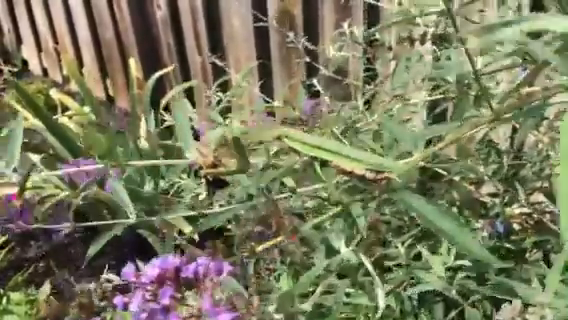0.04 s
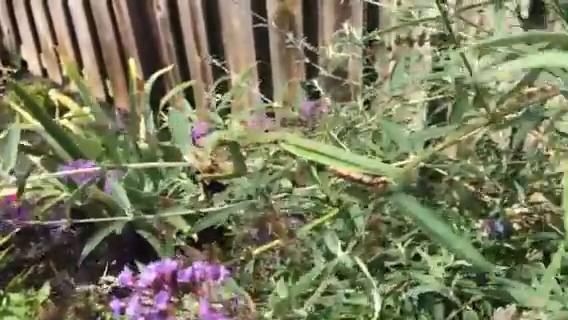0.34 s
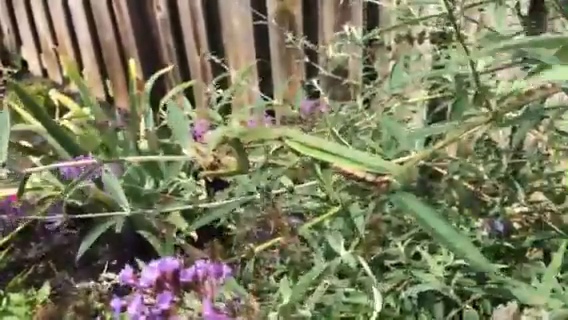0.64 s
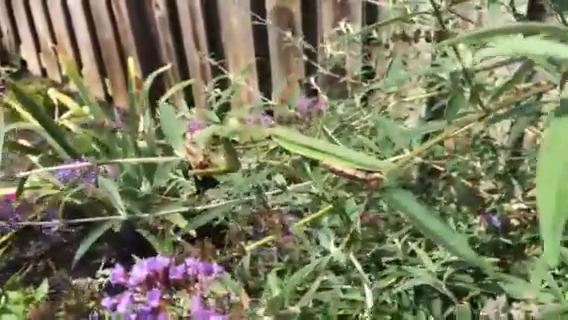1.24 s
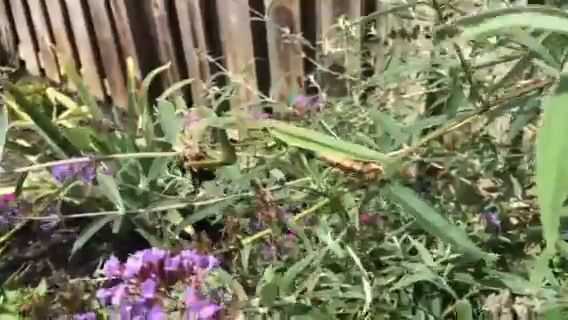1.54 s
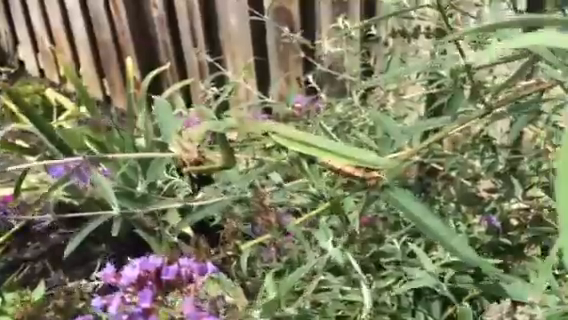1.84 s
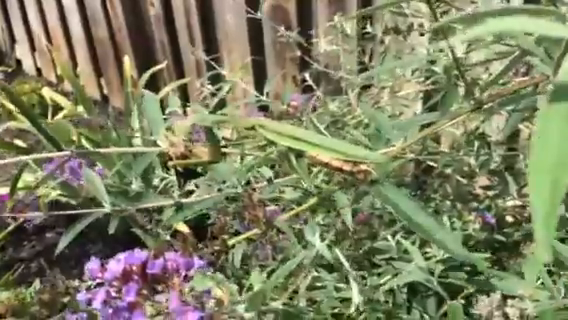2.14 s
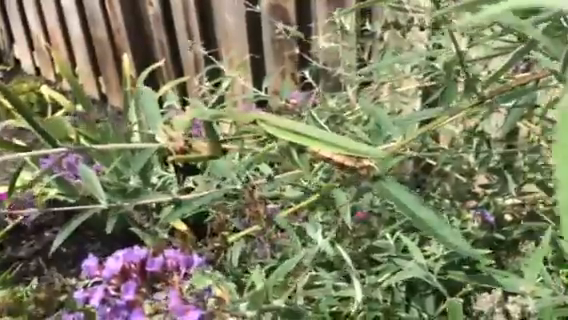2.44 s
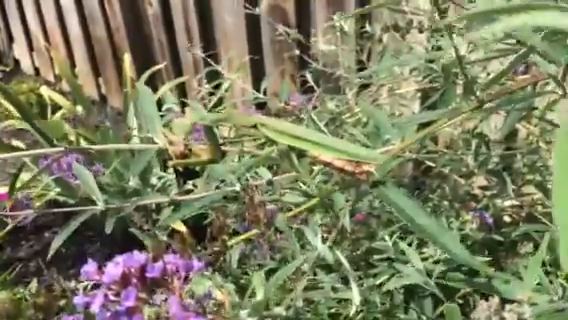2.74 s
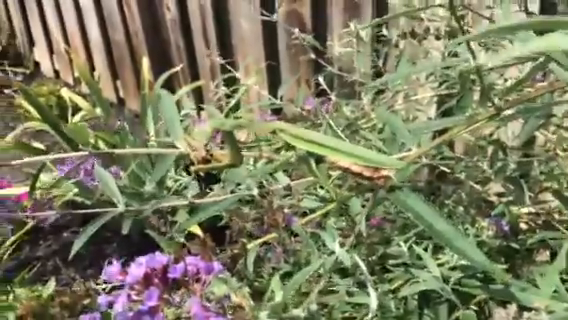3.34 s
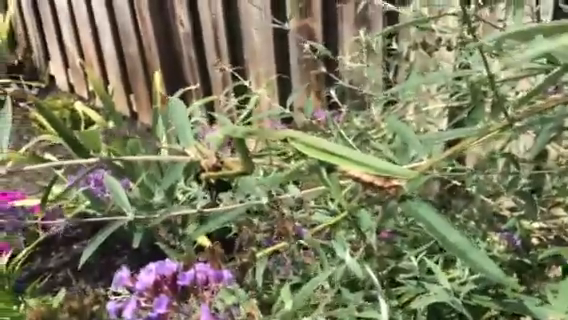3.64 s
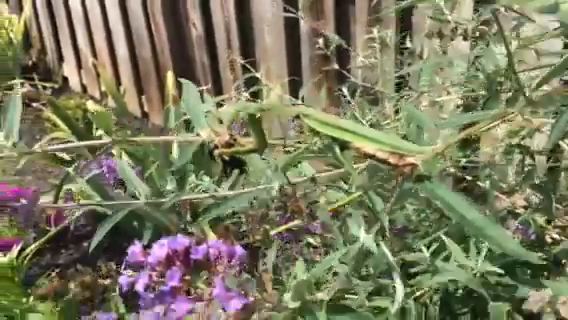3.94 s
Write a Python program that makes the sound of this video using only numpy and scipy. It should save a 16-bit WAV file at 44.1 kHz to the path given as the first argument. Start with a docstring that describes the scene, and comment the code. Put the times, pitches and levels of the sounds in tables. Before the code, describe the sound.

A cricket chirps steadily in a garden while other insects buzz high above it and a lower cricket trills in short runs during the first half. Faint wind rumble and a distant motor hum lie behind.

```python
"""Sunny garden with insects.

A cricket chirps steadily, a lower one trills in short runs, and bush-crickets buzz high above
them, one regularly, the others loosely. Each call is a train of wing strokes, short gliding
tones scattered by leaves and a fence. Twigs tick; faint wind rumble, a distant motor hum and
the thin hiss of far insects lie behind."""
import sys
import numpy as np
from scipy import signal
from scipy.fft import rfft, irfft
from scipy.io import wavfile

SR = 44100
rng = np.random.default_rng(int(sys.argv[2]) if len(sys.argv) > 2 else 0)


def master_out(mix):
    """Clip the mix to full scale and print it as 16-bit PCM to the path in sys.argv[1]."""
    frames = np.transpose(np.atleast_2d(mix))
    ceiling = np.clip(frames, -1, 1)
    pcm = np.round(ceiling * 32767).astype(np.int16)
    wavfile.write(sys.argv[1], SR, pcm)


N = 176400
T = np.arange(N) / SR


def from_db(db):
    """Decibels to gain."""
    return 10 ** (np.asarray(db) / 20)


def gain_curve(points):
    """Gain over time from (time [s], level [dB]) points."""
    return from_db(np.interp(T, *np.transpose(points)))


def add(out, start_s, sound):
    """Mix a sound in at start_s."""
    i = int(round(start_s * SR))
    a, b = max(i, 0), min(i + len(sound), len(out))
    if b > a:
        out[a:b] += sound[a - i:b - i]


def noise(gain_at):
    """Unit-rms noise shaped by gain_at(hz)."""
    hz = np.maximum(np.arange(N // 2 + 1) * SR / N, 1)
    shaped = irfft(rfft(rng.standard_normal(N)) * gain_at(hz), N)
    return shaped / np.sqrt(np.mean(shaped ** 2) + 1e-30)


def coloured_noise(points):
    """Unit-rms noise from (frequency [Hz], relative level [dB]) points."""
    hz, db = np.transpose(points)
    return noise(lambda f: from_db(np.interp(np.log(f), np.log(hz), db)))


def band_noise(hz, width_hz):
    """Unit-rms noise in one steep-sided band."""
    return noise(lambda f: 1 / (1 + (2 * (f - hz) / width_hz) ** 4))


def wing_stroke(length_s, hz, fall_hz=0, arch_hz=0):
    """A tone that swells and fades while its pitch falls or arches."""
    u = np.linspace(-1, 1, max(int(length_s * SR), 2))
    pitch_hz = hz - fall_hz * u / 2 - arch_hz * u ** 2
    cycles = np.cumsum(pitch_hz) / SR + rng.random()
    return np.cos(np.pi * u / 2) * np.sin(2 * np.pi * cycles)


def scatter(call, echo_db, t60_s=.28):
    """A call plus its decaying echoes from leaves and fence."""
    t = T[:SR // 2]
    echoes = rng.standard_normal(len(t)) * from_db(-60 * t / t60_s)
    echoes /= np.sqrt(np.sum(echoes ** 2))
    return call + from_db(echo_db) * signal.fftconvolve(call, echoes)[:N]


# Wind and far traffic: (frequency [Hz], relative level [dB])
AIR_SPECTRUM = [(20, -19), (35, -5), (55, -1), (100, 1.5), (150, -2), (205, -6.2), (320, -15.3),
                (500, -17.6), (800, -19.1), (1400, -25.2), (2200, -33), (3500, -38.3), (6000, -42),
                (7600, -43), (11000, -46.5), (15000, -48)]
# Low-end swell: (time [s], gain [dB])
GUST_GAINS = [(0, 1), (.6, -.5), (.92, 0), (.965, 6), (1.02, -1.5), (1.63, -2), (1.675, 2), (1.72, -1.5),
              (2.1, -1.5), (2.5, 1.5), (3.05, -.5), (3.4, 1.5), (4, 1.5)]
# Treble hiss: (frequency [Hz], relative level [dB])
HISS_SPECTRUM = [(8000, -30), (10500, -6), (12800, -4), (13700, 0), (14400, -1), (15150, 2), (15600, -30)]
# Treble hiss: (time [s], level [dB])
HISS_LEVELS = [(0, -80), (.5, -80), (1.2, -78), (1.58, -78.5), (1.68, -90), (1.85, -82), (2.7, -82.5),
               (2.82, -96), (3.3, -96), (3.42, -83), (4, -82)]


def air(bed_db=-52.4, gust_cutoff_hz=220):
    """Outdoor noise whose low end swells with the wind; thin hiss on top."""
    bed = from_db(bed_db) * coloured_noise(AIR_SPECTRUM)
    rumble = signal.sosfiltfilt(signal.butter(2, gust_cutoff_hz, fs=SR, output="sos"), bed)
    hiss = gain_curve(HISS_LEVELS) * coloured_noise(HISS_SPECTRUM)
    return bed + (gain_curve(GUST_GAINS) - 1) * rumble + hiss


# Motor hum: (time [s], level [dB])
HUM_LEVELS = [(0, -41), (.33, -42), (.5, -54), (.8, -54), (.95, -52), (1.12, -60), (1.35, -53), (1.55, -61),
              (1.85, -51), (2.1, -57), (2.6, -52), (2.9, -51), (3.07, -57), (3.17, -47), (3.45, -42.5),
              (3.7, -39), (3.92, -41), (4, -51)]
# Machine drones: (centre [Hz], width [Hz], level [dB])
DRONE_BANDS = [(56, 6, -62), (75, 5, -59.5), (117, 10, -58), (172, 16, -62.5), (228, 10, -65),
               (294, 8, -73), (411, 12, -76), (1001, 5, -84), (1235, 4, -80.5)]


def motors(hum_hz=117, waver_hz=.9):
    """A far motor fades and returns among fainter machine drones."""
    pitch_hz = hum_hz + waver_hz * band_noise(0, width_hz=8)
    hum = gain_curve(HUM_LEVELS) * np.sin(2 * np.pi * np.cumsum(pitch_hz) / SR)
    drones = sum(from_db(db) * band_noise(hz, width_hz) for hz, width_hz, db in DRONE_BANDS)
    return hum + drones


def far_insects():
    """Distant buzzes and trills blur into two noise bands."""
    buzzes = from_db(-86) * band_noise(hz=8720, width_hz=650)
    trills = from_db(-89) * band_noise(hz=3310, width_hz=450)
    return buzzes + trills


# Twig snaps: (time [s], level [dB], T60 [s])
TWIG_TICKS = [(.390, -66, .012), (.475, -68, .014), (.493, -66.5, .025), (.586, -63, .045),
              (.606, -63, .035), (1.3375, -55, .004), (1.619, -55, .004)]
# Snap colour: (frequency [Hz], relative level [dB])
TWIG_SPECTRUM = [(1500, -14), (3000, -4), (4000, 3), (5000, -2), (7000, -1), (11000, -5), (15000, -12)]


def twigs():
    """Tiny dry snaps: noise with instant onset and fast decay."""
    envelope, t = np.zeros(N), T[:SR // 10]
    for time_s, db, t60_s in TWIG_TICKS:
        add(envelope, time_s, from_db(db - 60 * t / t60_s))
    return envelope * coloured_noise(TWIG_SPECTRUM)


def buzz(length_s, rate_hz, stroke_s, resonances):
    """Rapid uneven wing strokes on (pitch [Hz], fall [Hz], gain [dB]) resonances."""
    jitter_s, spread_db, spread_hz, edge_db = .0006, 1.3, 70, -5
    out = np.zeros(SR // 4)
    for time_s in np.arange(0, length_s, 1 / rate_hz):
        late, loud, sharp = rng.standard_normal(3)
        taper_db = edge_db * (2 * time_s / length_s - 1) ** 4
        stroke = sum(from_db(db) * wing_stroke(stroke_s, hz + spread_hz * sharp, fall_hz)
                     for hz, fall_hz, db in resonances)
        add(out, time_s + jitter_s * late, from_db(taper_db + spread_db * loud) * stroke)
    return out


# Loose buzzes: (start [s], end [s], level [dB], pitch [Hz])
LOOSE_BUZZES = [(0, .03, -68, 8550), (.10, .16, -73, 8550), (.20, .23, -68, 8250), (.232, .277, -64, 8480),
                (.41, .46, -74, 8800), (.475, .55, -64.5, 8480), (.58, .61, -68, 8450),
                (.69, .75, -70, 8700), (.745, .865, -64, 8500), (1.005, 1.03, -67, 8800),
                (1.035, 1.165, -64, 8520), (1.17, 1.20, -71, 8220), (1.265, 1.37, -65, 8500),
                (1.43, 1.48, -74, 8800), (1.51, 1.62, -66, 8500), (1.765, 1.86, -64, 8450),
                (1.94, 2.01, -73, 8750), (2.07, 2.16, -65, 8470), (2.19, 2.23, -70, 8400),
                (2.315, 2.50, -67, 8550), (2.53, 2.58, -73, 8700), (2.615, 2.64, -69, 8350),
                (2.642, 2.685, -64, 8550), (2.79, 2.88, -72, 8650), (3.03, 3.12, -64, 8550),
                (3.13, 3.18, -73, 8400), (3.25, 3.30, -72, 8600), (3.33, 3.40, -72, 8750),
                (3.47, 3.54, -72, 8750), (3.555, 3.635, -64, 8520), (3.68, 3.78, -69, 8700),
                (3.79, 3.87, -64, 8550), (3.93, 4.0, -68, 8500)]


def loose_bush_crickets(rate_hz=131, stroke_s=.0062, fall_hz=720, trim_db=-2.8):
    """Irregular buzzes, each on one wing resonance."""
    out = np.zeros(N)
    for start_s, end_s, db, hz in LOOSE_BUZZES:
        call = buzz(end_s - start_s, rate_hz, stroke_s, [(hz, fall_hz, trim_db)])
        add(out, start_s - stroke_s, from_db(db) * call)
    return scatter(out, echo_db=-2)


# Regular buzzes: (centre time [s], level [dB])
REGULAR_BUZZES = [(.141, -68), (.373, -68), (.617, -69), (.866, -69), (1.115, -68), (1.363, -66),
                  (1.612, -67), (1.850, -67), (2.085, -67), (2.326, -67), (2.564, -66), (2.800, -67),
                  (3.046, -66), (3.273, -69), (3.514, -70), (3.756, -69), (3.995, -68)]


def regular_bush_cricket(length_s=.058, rate_hz=138, stroke_s=.0048):
    """About four buzzes a second on two wing resonances."""
    resonances = [(9530, 550, -2.6), (8780, 900, -3)]
    out = np.zeros(N)
    for centre_s, db in REGULAR_BUZZES:
        call = buzz(length_s, rate_hz, stroke_s, resonances)
        add(out, centre_s - length_s / 2, from_db(db) * call)
    return scatter(out, echo_db=-6)


# Trills: (first stroke [s], last stroke [s], spacing [s], first level [dB], last level [dB])
TRILL_RUNS = [(.007, .048, .02, -65, -58), (.410, .478, .023, -66, -59), (.546, .569, .023, -63, -59),
              (.592, .608, .016, -47, -58), (.635, .748, .016, -69, -64), (.765, .867, .017, -63, -62),
              (.886, .929, .021, -61, -61), (1.233, 1.325, .0153, -69, -69),
              (1.343, 1.431, .0176, -69, -66), (1.766, 1.790, .024, -65, -62),
              (1.852, 1.936, .0168, -63, -70.5), (2.093, 2.120, .027, -72, -72)]


def trilling_cricket(pitch_hz=3310, spread_hz=28, fall_hz=330, stroke_s=.0105, trim_db=-.6):
    """Runs of short falling wing strokes, each run on a level ramp."""
    out = np.zeros(N)
    for first_s, last_s, spacing_s, first_db, last_db in TRILL_RUNS:
        count = int(round((last_s - first_s) / spacing_s)) + 1
        times_s = np.linspace(first_s, last_s, count)
        levels_db = np.linspace(first_db, last_db, count)
        for time_s, db in zip(times_s, levels_db):
            stroke = wing_stroke(stroke_s, pitch_hz + rng.normal(0, spread_hz), fall_hz)
            add(out, time_s - stroke_s / 2, from_db(db + trim_db) * stroke)
    return scatter(out, echo_db=-18)


# Chirps, timed at the first strong stroke: (time [s], level [dB])
CRICKET_CHIRPS = [(.264, -62.5), (.608, -62.5), (.980, -64), (1.356, -62), (1.728, -62), (2.106, -63),
                  (2.447, -64), (2.818, -65), (3.183, -64), (3.575, -62), (3.939, -62)]
# Strokes of one chirp: (offset [s], relative level [dB], pitch [Hz])
CHIRP_STROKES = [(-.034, -8.5, 4790), (0, 0, 4895), (.041, 0, 4920), (.070, -12.5, 4850)]


def chirping_cricket(stroke_s=.021, spread_hz=15, trim_db=-3.2, fence_echo_s=.014, fence_echo_db=-11):
    """Four raspy wing strokes a chirp, the middle two strong, each smeared by a close echo off the fence."""
    tones = np.zeros(N)
    for time_s, chirp_db in CRICKET_CHIRPS:
        for offset_s, stroke_db, hz in CHIRP_STROKES:
            start_s = time_s + offset_s - stroke_s / 2
            gain = from_db(chirp_db + stroke_db + trim_db)
            stroke = gain * wing_stroke(stroke_s, hz + rng.normal(0, spread_hz), arch_hz=300)
            add(tones, start_s, stroke)
            add(tones, start_s + fence_echo_s * rng.uniform(.5, 1.5), from_db(fence_echo_db) * stroke)
    envelope = np.abs(signal.hilbert(tones))
    rasp = from_db(-11) * envelope * band_noise(hz=4680, width_hz=460)
    return scatter(tones + rasp, echo_db=-1.5)


def scene():
    """Mono mix of insects and background."""
    insects = chirping_cricket() + trilling_cricket() + regular_bush_cricket() + loose_bush_crickets()
    background = far_insects() + twigs() + motors() + air()
    return (insects + background)[None]


def record(dry):
    """Steep low-pass on the top treble."""
    cutoff_hz = 15350
    return signal.sosfilt(signal.ellip(12, .1, 80, cutoff_hz, fs=SR, output="sos"), dry)


dry = scene()
out = record(dry)
master_out(out)
```